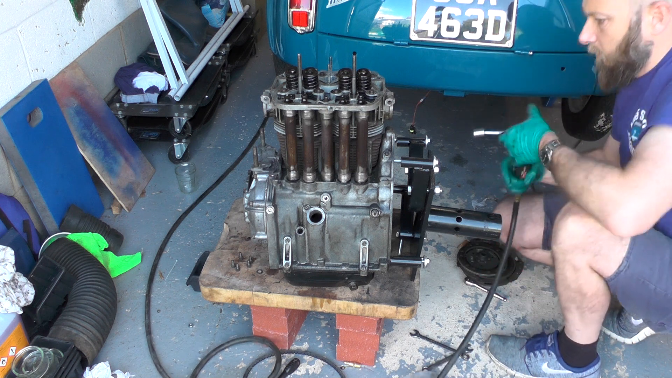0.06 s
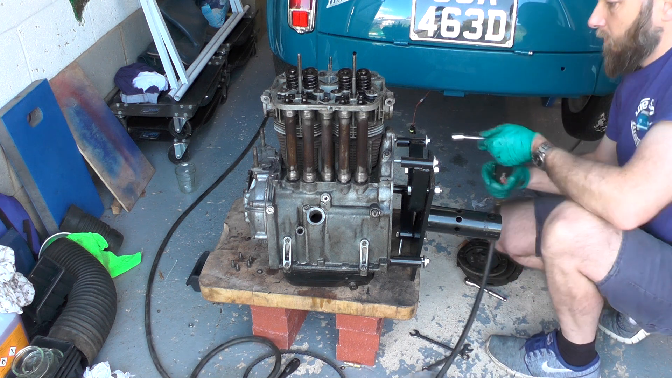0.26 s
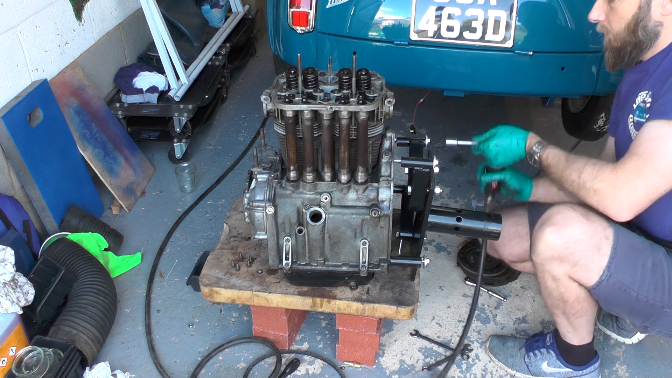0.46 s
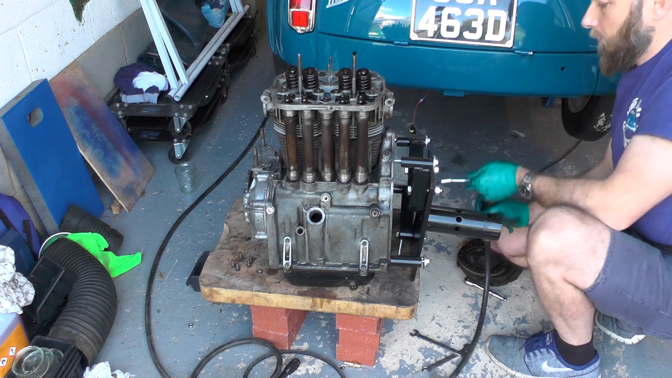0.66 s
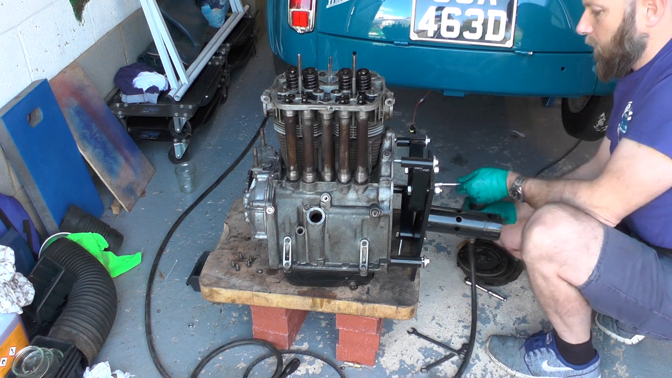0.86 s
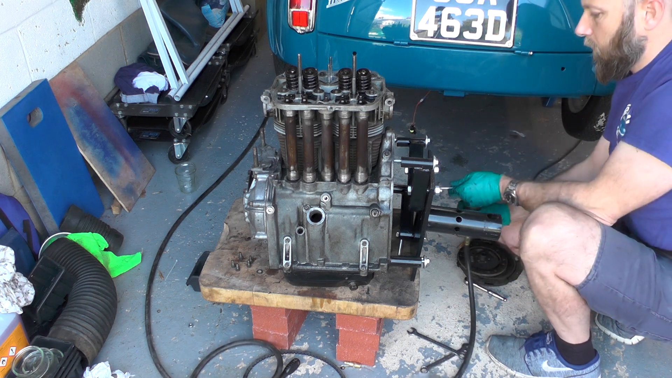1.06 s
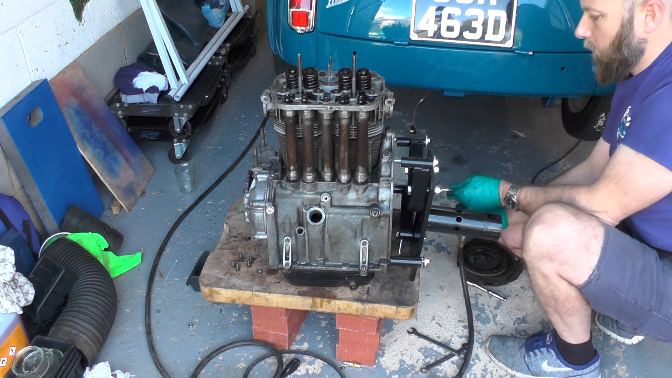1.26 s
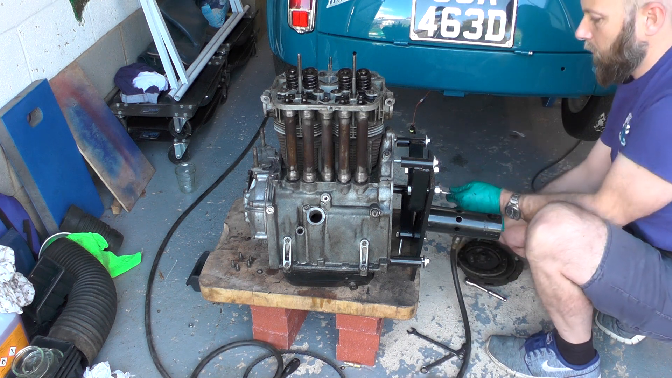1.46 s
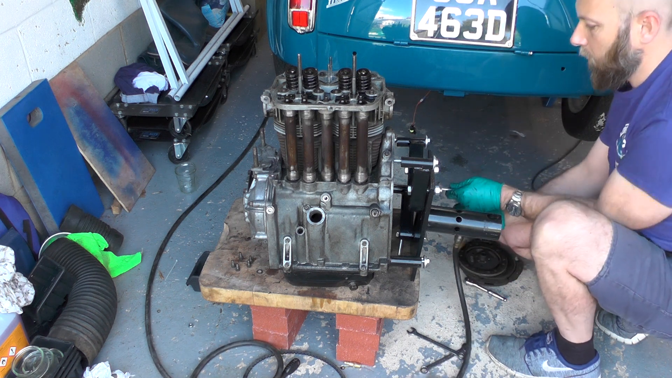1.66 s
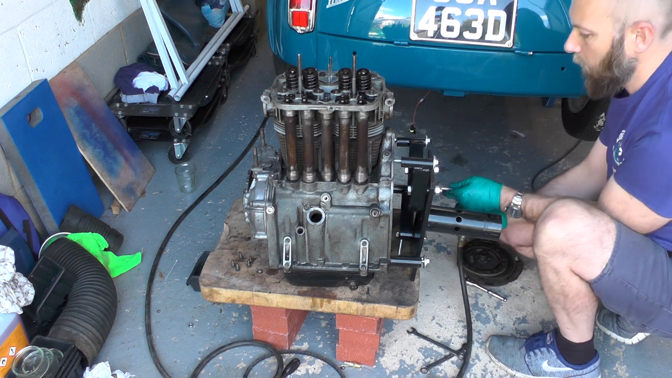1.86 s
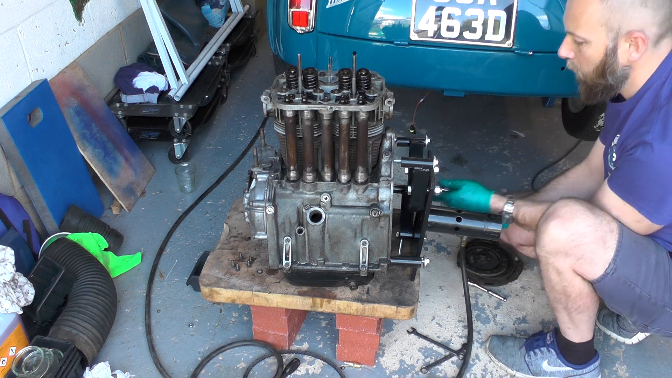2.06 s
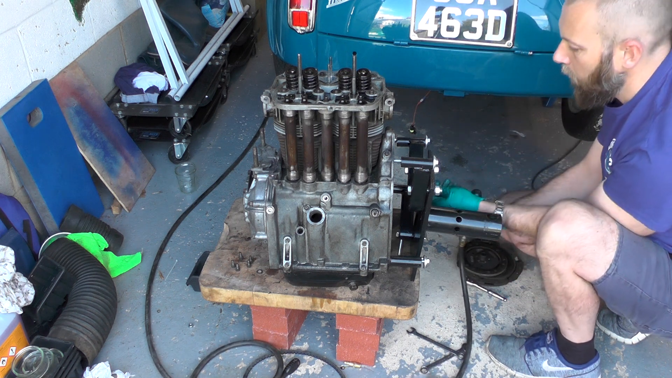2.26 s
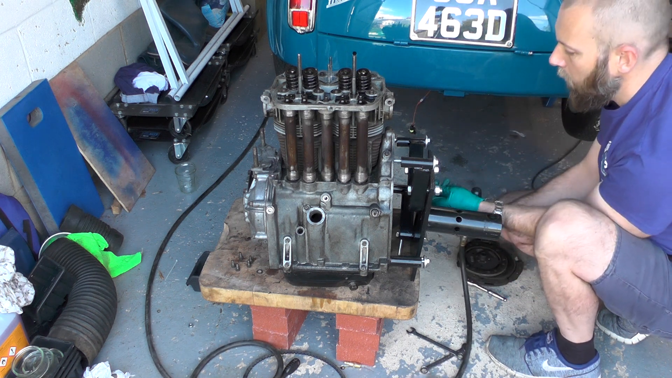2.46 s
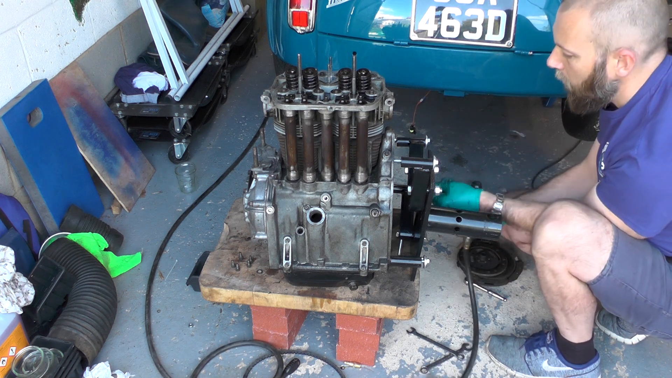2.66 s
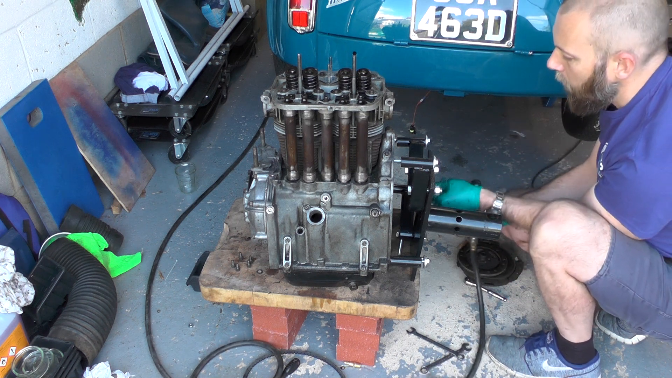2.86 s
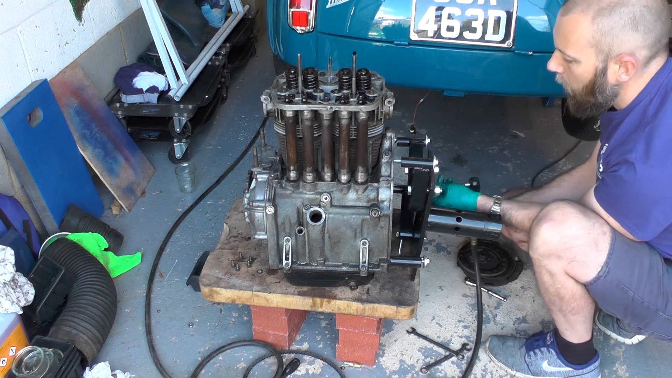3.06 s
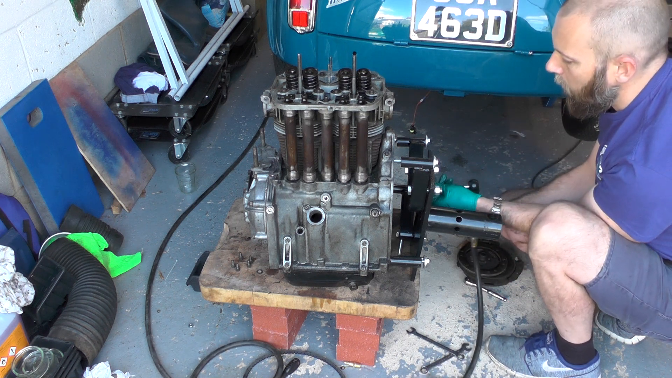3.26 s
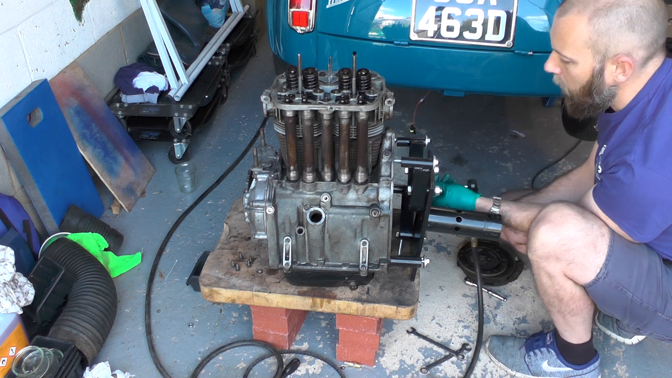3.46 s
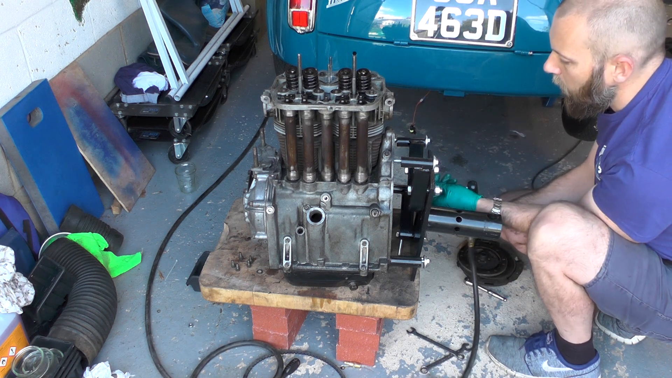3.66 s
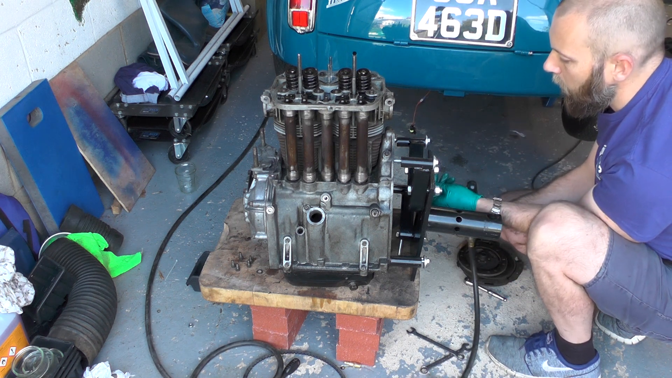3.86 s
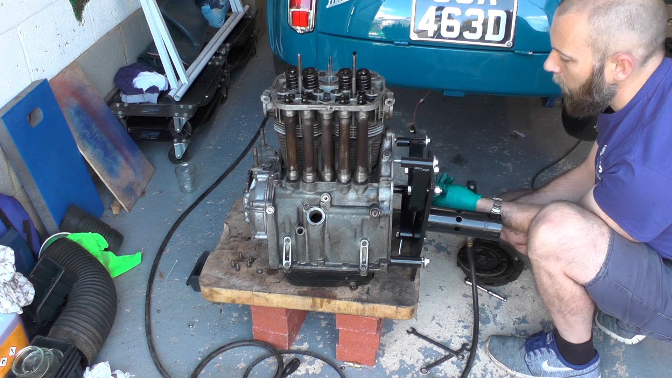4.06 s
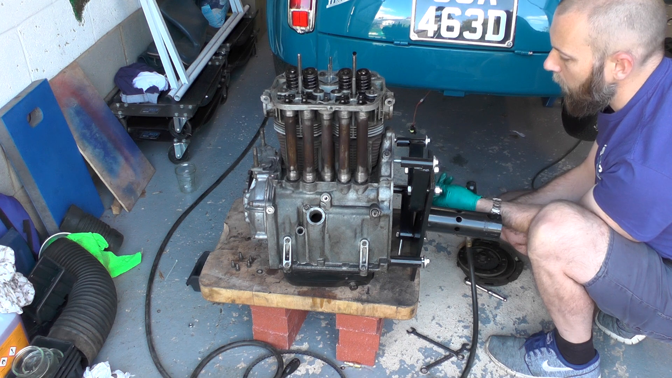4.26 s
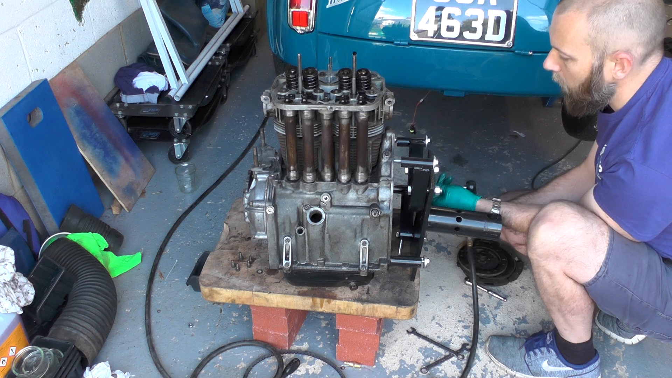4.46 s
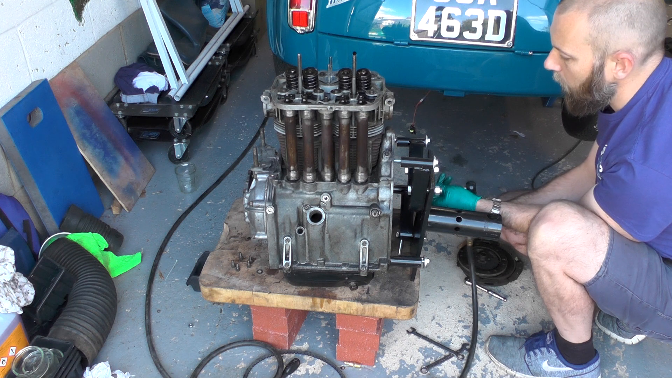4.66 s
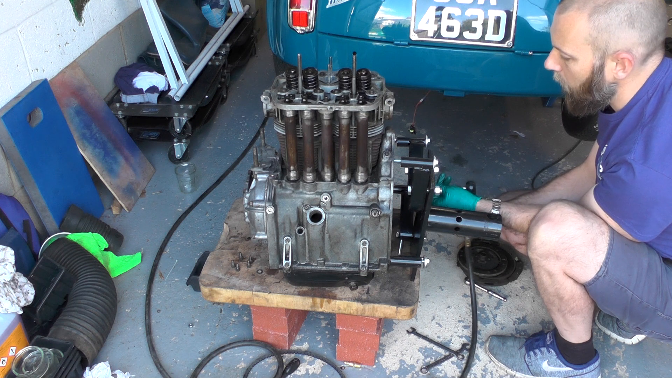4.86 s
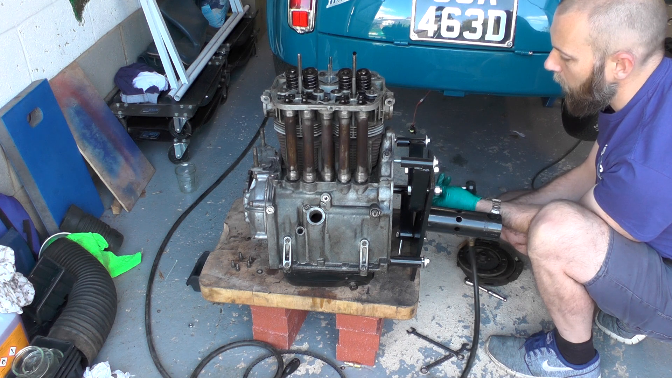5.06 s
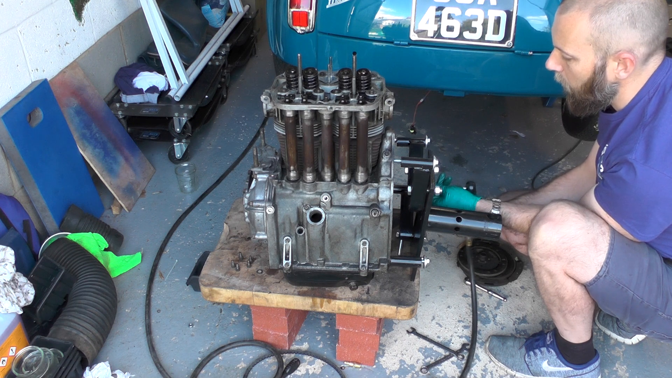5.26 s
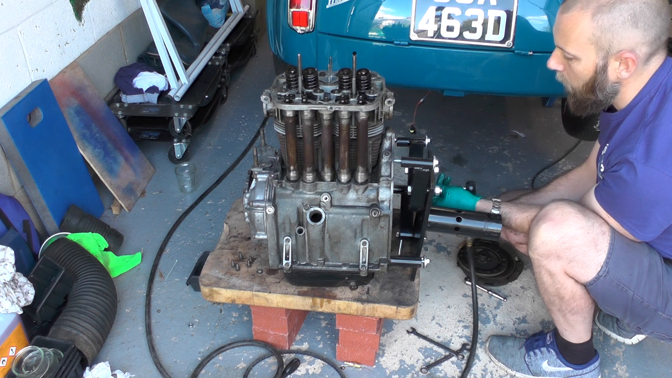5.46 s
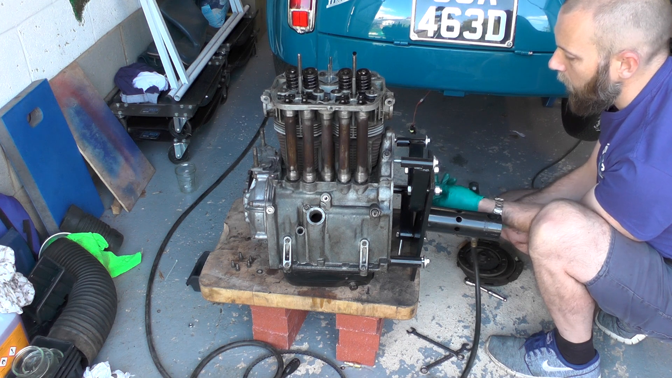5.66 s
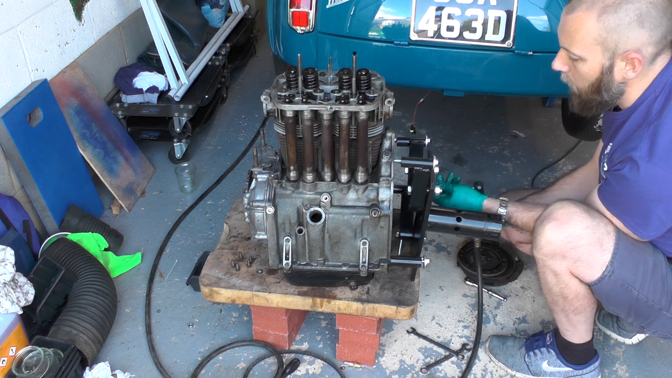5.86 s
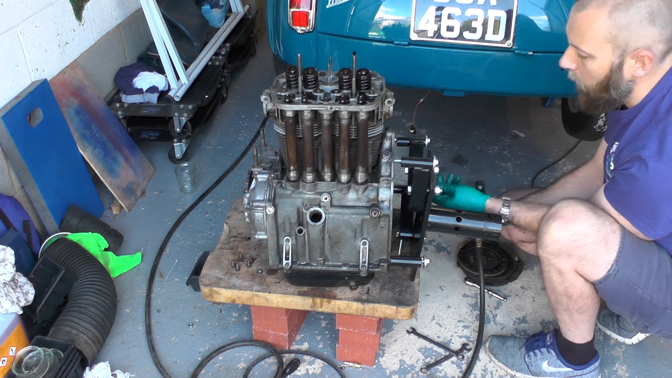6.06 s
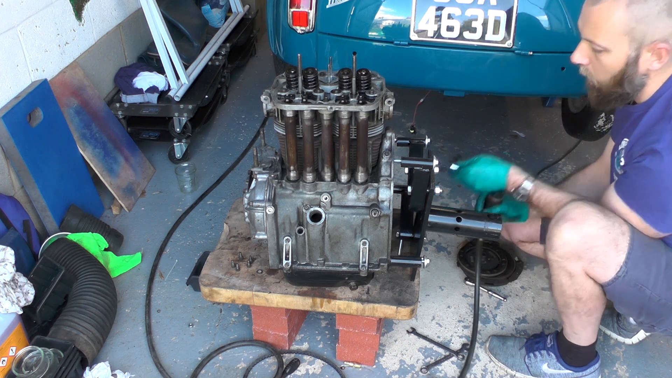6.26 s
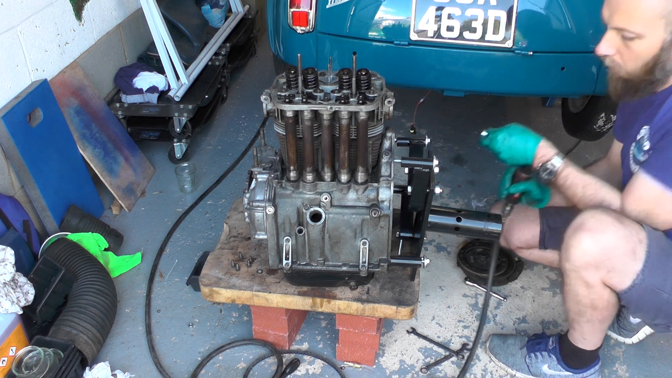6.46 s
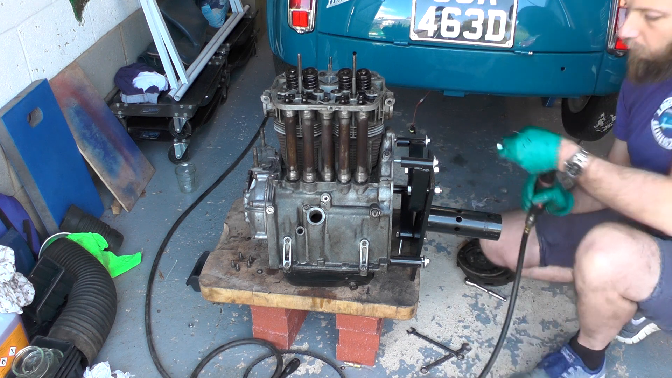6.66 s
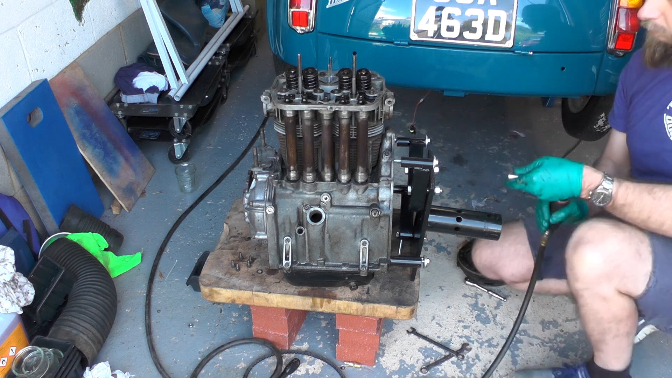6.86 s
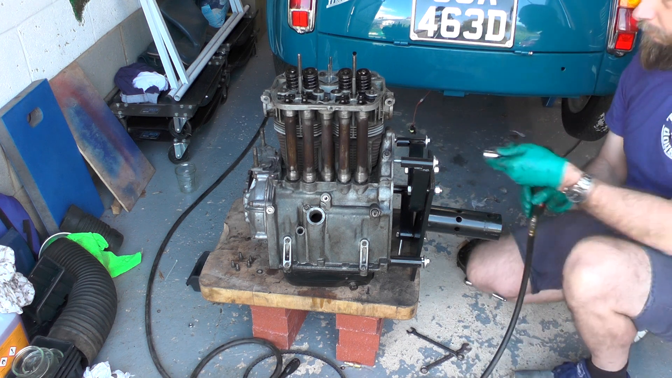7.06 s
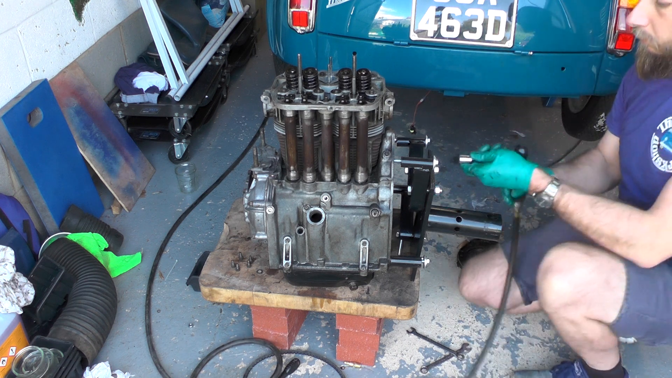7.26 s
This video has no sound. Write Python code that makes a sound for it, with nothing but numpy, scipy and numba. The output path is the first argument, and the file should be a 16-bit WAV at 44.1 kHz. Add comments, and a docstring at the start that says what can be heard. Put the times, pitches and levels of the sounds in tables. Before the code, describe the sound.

Steel knocks and ticks, then six short loud air ratchet bursts whining over hissing exhaust, and more hard clunks in a small garage.

```python
"""An air ratchet on a hose, close to the microphone, spins up six times as bolts are run into an engine stand:
its vanes chop the exhaust into a whine over a hiss of air, and its gears rattle.
Around it steel knocks and ticks, loose bolts chink, a thread squeaks, gloves scuff and dull bumps land, in a
small hard garage. Behind are mains hum, a distant road and draught on the microphone; the recorder's gain
control ducks everything when it gets loud."""
import sys
import numpy as np
from scipy import signal
from scipy.fft import rfft, irfft, next_fast_len
from scipy.io import wavfile
from scipy.ndimage import uniform_filter1d
from numba import njit

SR = 44100
rng = np.random.default_rng(int(sys.argv[2]) if len(sys.argv) > 2 else 0)


def wrap_up_sound(samples):
    """Save the sound to the file named by the first command line argument, as 16-bit audio."""
    columns = np.atleast_2d(samples).T
    # keep every value between -1 and 1, then stretch to whole-number steps
    tamed = np.clip(columns, -1, 1)
    steps = np.round(tamed * 32767).astype(np.int16)
    wavfile.write(sys.argv[1], SR, steps)


N = 321908
T = np.arange(N) / SR  # time, s

# Event levels are those before the room and the gain control; spectra give relative levels.
# distant road spectrum: pitch_hz, level_db (per Hz)
ROAD = [(35, -12), (70, 1.5), (120, -9), (155, -10.5), (200, -9.5), (400, -14.5), (600, -13), (900, -8.5),
        (1400, -16.5), (2400, -24.5), (4000, -27.5), (8300, -38.5), (10500, -44), (16000, -47.5)]
# cars passing on the road: nearest_s, half_length_s, rise_db
CARS = [(0, 0.44, 8.5), (1.95, 1, 7)]
# mains lines: pitch_hz, level_db
HUM = [(100, -48.5), (200, -59)]
# air buffeting the microphone, spectrum: pitch_hz, level_db (per Hz)
BUFFET = [(6, -7.5), (12, -1.5), (22, -9.5), (40, -24), (80, -45), (200, -45.5), (600, -72.5)]
# gusts on top of the steady draught: strongest_s, half_length_s, level_db
GUSTS = [(0, 0.56, -39.5), (1.317, 0.18, -37.5), (4.988, 0.13, -9), (7.09, 0.82, -21)]
# garage reverberation: pitch_hz, t60_s
GARAGE = [(200, 0.62), (700, 0.29), (1500, 0.41), (4000, 0.39), (8000, 0.37), (15000, 0.22)]
# engine parts ringing on in sympathy: pitch_hz, level_db (at resonance), t60_s
SYMPATHY = [(1456, -21, 2.5), (1467, -21, 2.2), (2371, -10, 1.4), (4460, -23, 1.0)]
# gloves, hose and shoes scuffing: middle_s, half_length_s, level_db
SCUFFS = [(0.015, 0.018, -39), (0.35, 0.082, -40), (0.566, 0.018, -29.5), (0.764, 0.053, -30.5),
          (1.112, 0.011, -36), (1.406, 0.056, -41.5), (2.177, 0.077, -52.5), (2.681, 0.041, -43),
          (2.87, 0.033, -44.5), (6.31, 0.16, -56.5), (6.573, 0.11, -41.5), (6.662, 0.054, -26),
          (6.862, 0.063, -26.5), (7.213, 0.073, -42.5)]
# scuffing spectrum, before its treble tilt: pitch_hz, level_db (per Hz)
SCUFF = [(90, -41), (200, -10.5), (450, -8.5), (1000, -3.5), (2000, -4), (3800, -4), (6000, -8.5),
         (8300, -6), (10500, -15.5), (16000, -19)]
# dull bumps of the hose and of a knee: start_s, peak_db, pitch_hz, t60_s
BUMPS = [(0.594, -28, 267, 0.12), (2.357, -27.5, 630, 0.078), (3.332, -22, 80, 0.045),
         (6.676, -23.5, 152, 0.16), (6.735, -20.5, 480, 0.12), (6.768, -20.5, 363, 0.066),
         (6.995, -33, 600, 0.037)]
# loose bolts chinking: start_s, peak_db
CHINKS = [(0.682, -36), (0.85, -40), (1.36, -57)]
# modes of a bolt, before each blow's scatter: pitch_hz, level_db, t60_s
BOLT = [(6200, -57, 0.27), (8050, 8, 0.36), (9400, 12, 0.16), (12730, 15, 0.25), (13900, -8, .2)]
# thin squeak of a thread turned by hand, before its wander: time_s, pitch_hz, level_db
SQUEAK = [(2.05, 13300, -66), (2.15, 15700, -73), (2.41, 14210, -67), (2.5, 12000, -66), (2.65, 11700, -73)]
# steel knocking on steel: start_s, peak_db, centre_hz, crack_t60_s
KNOCKS = [(0.012, -20.5, 4000, 0.02), (0.473, -13.5, 6040, .012), (0.474, -4.5, 2190, 0.031),
          (0.528, -12, 1830, 0.021), (0.558, -18.5, 3280, .045), (0.596, -14.5, 1310, 0.031),
          (0.654, -16.5, 2270, 0.03), (1.08, -14, 2920, 0.061), (1.1, -14, 2080, 0.033),
          (2.653, -30.5, 3020, 0.017), (2.692, -22.5, 2330, 0.021), (2.829, -29.5, 2170, 0.015),
          (6.56, -21.5, 4540, 0.023), (6.603, -17, 4300, 0.039), (6.674, -8, 990, 0.035),
          (6.728, -5, 1520, 0.025), (6.77, -10.5, 810, 0.031), (6.839, -10, 1220, 0.028),
          (7.241, -22.5, 4240, 0.029), (7.282, -23, 1220, 0.028)]
# spells of light ticks from fiddling with socket and bolt: start_s, end_s, typical_peak_db, centre_hz
FIDDLING = [(1.11, 1.16, -25, 3600), (1.22, 1.429, -32.5, 4300), (2.135, 2.224, -30, 2000),
            (2.704, 2.755, -36, 4550), (2.85, 2.896, -28, 2960), (6.68, 6.767, -34, 1500)]
# modes of the socket against the stand, before each blow's scatter: pitch_hz, level_db, t60_s
STEEL = [(742, 4, 0.087), (1050, 8, 0.037), (1125, -27.5, 0.039), (1570, 2, 0.033), (1743, 6.5, 0.055),
         (1883, 6.5, 0.026), (2460, -15.5, 0.079), (3250, -10.5, 0.05), (3000, -54, 0.059),
         (3670, -46, 0.049), (4790, -5.5, .08), (7500, -12, .07)]
# crack of a contact, spectrum: pitch_hz, level_db (per Hz)
CRACK = [(100, -15), (400, -15), (900, -1.5), (2000, -2), (3800, -4.5), (5500, -13), (8500, -2.5),
         (10500, -17.5), (16000, -20)]
# trigger pulls: pressed_s, released_s, free_vane_rate_hz, level_db, first_rush_db,
# seating_share (of speed lost as the bolt seats)
PULLS = [(3.33, 3.496, 1532, -6.5, 4.5, 0.00033), (3.679, 4.226, 1533, -2.5, 9.5, 0.031),
         (4.354, 4.53, 1530, -0.4, 7.5, 0.00024), (4.618, 4.77, 1526, 0, 11.5, 0.0002),
         (5.008, 5.153, 1543, -2.7, 13, 0.0012), (5.315, 5.435, 1535, -4.5, 13, 0.0023)]
# exhaust port response that the vane harmonics sweep through: pitch_hz, level_db
PORT = [(430, -21.5), (600, 4), (820, 11.5), (1100, 5.5), (1300, 3.5), (1430, 7.5), (1500, 2.5),
        (2000, -0.5), (2820, -8.5), (3000, -1.5), (3500, -4), (4250, -5), (4500, -1.5), (5750, -17),
        (7100, -6), (8500, -2.5), (10000, 5.5)]
# exhaust hiss spectrum: pitch_hz, level_db (per Hz)
HISS = [(130, -44), (270, -37.5), (420, -13.5), (800, -12.5), (1700, 7.5), (2400, -2.5), (3400, 5),
        (4700, 5.5), (5900, -4.5), (7200, 9), (8400, 4), (10000, -5), (15500, -5.5)]

ROAD_DB, DRAUGHT_DB = -48, -43.5  # road between cars; steady draught
TICK_GAP_S, TICK_RANGE_DB, TICK_T60_S = .03, 5.8, .028  # mean spacing, greatest deviation, crack decay
VALVE_S, START_S = .0097, .0045  # time constant of the opening valve; delay of the rotor behind the air
SAG_SHARE, SAG_S = .078, .225  # share of speed lost as hose pressure droops, and its time scale
SEAT_S = .02623  # time constant of the load growing as a bolt seats
FUNDAMENTAL_DB, OCTAVE_DB, OVERTONE_DB = -23, -12.5, -18  # vane harmonics, relative; the last is the third
FUNDAMENTAL_SAG_DB, OCTAVE_SAG_DB = 3, -2  # their change at full droop
OVERTONE_STEP_DB = -1.5  # change per harmonic above the third
OVERTONE_CUT, OVERTONE_RISE = 1.07, .75  # powers of air pressure, and of speed per harmonic number
LURCH = .12  # unevenness of a slow rotor, as a share of its speed


def undb(db):
    """Decibels to gain."""
    return 10 ** (np.asarray(db) / 20)


def unit(x):
    """Scale to rms 1."""
    return x / np.sqrt(np.mean(x ** 2))


def decay(t, t60):
    """Exponential decay by 60 dB in t60 seconds."""
    return np.exp(-np.log(1000) * t / t60)


def swell(middle_s, half_s):
    """A smooth rise and fall with a top of 1."""
    return np.exp(-((T - middle_s) / half_s) ** 2)


def curve(rows, axis=1):
    """One column of a time table, at every sample."""
    rows = np.asarray(rows)
    return np.interp(T, rows[:, 0], rows[:, axis])


def at(points, hz):
    """Read a spectrum on a log-frequency axis."""
    f, value = np.transpose(points)
    return np.interp(np.log(np.maximum(hz, 1)), np.log(f), value)


def noise(points, size=N, tilt_db=0):
    """Noise of rms 1 with a given spectrum, tilted above 500 Hz by dB per octave."""
    padded = next_fast_len(size)
    hz = np.maximum(np.fft.rfftfreq(padded, 1 / SR), 1)
    gain = undb(at(points, hz) + tilt_db * np.log2(np.maximum(hz, 500)))
    white = rfft(rng.standard_normal(padded))
    return unit(irfft(white * gain, padded)[:size])


def walk(rate):
    """Smooth random wander with an rms of 1, taking about `rate` new values a second."""
    k = max(int(SR / rate), 2)
    steps = np.repeat(rng.standard_normal(N // k + 1), k)
    return unit(uniform_filter1d(steps, k)[:N])


def add(out, start_s, x):
    """Mix a sound in at its time."""
    i = max(int(start_s * SR), 0)
    out[i:i + len(x)] += x[:max(N - i, 0)]


def add_peak(out, start_s, x, peak_db):
    """Mix a sound in at its time and peak level."""
    add(out, start_s, x * undb(peak_db) / np.abs(x).max())


def ring(modes, t):
    """Decaying modes; every blow lands elsewhere and weights them anew."""
    hz, db, t60 = np.transpose(modes)[:, :, None]
    weight, detune, turn = rng.standard_normal((3, len(modes), 1))
    waves = np.sin(2 * np.pi * (hz * (1 + 0.0088 * detune) * t + turn))
    return np.sum(undb(db + 2 * weight) * decay(t, t60) * waves, axis=0)


def distant_road():
    """Far tyre noise, swelling as cars pass."""
    passing_db = sum(db * swell(s, half_s) for s, half_s, db in CARS)
    return noise(ROAD) * undb(ROAD_DB + passing_db + 1.1 * walk(10))


def mains_hum():
    """Steady mains lines whose level wavers together."""
    lines = sum(np.sqrt(2) * undb(db) * np.sin(2 * np.pi * hz * T) for hz, db in HUM)
    return undb(2 * walk(8)) * lines


def draught():
    """Air moving over the microphone: low buffeting that swells with the gusts."""
    strength = undb(DRAUGHT_DB) + sum(undb(db) * swell(s, half_s) for s, half_s, db in GUSTS)
    return noise(BUFFET) * strength


def garage(x, wet_db=-10, early_db=-13, early_s=0.012):
    """Close reflections, then the tail of a small hard room that decays differently in each band."""
    t = T[:SR]
    white, hz = rfft(rng.standard_normal(SR)), np.fft.rfftfreq(SR, 1 / SR)
    tail = 0
    for row, (_, t60) in zip(np.eye(len(GARAGE)), GARAGE):
        # each band's share fades out towards its neighbours
        share = at([(f, w) for (f, _), w in zip(GARAGE, row)], hz)
        tail = tail + irfft(white * share, SR) * decay(t, t60)
    early = rng.standard_normal(SR) * np.exp(-t / early_s)
    late = undb(wet_db) * unit(tail * (t > .008))
    close = undb(early_db) * unit(early * (t > .002))
    return x + signal.fftconvolve(x, (late + close) / np.sqrt(SR))[:N]


def sympathy(x):
    """Lightly damped steel picks up the sound and rings on."""
    out = np.zeros(N)
    for hz, db, t60 in SYMPATHY:
        pole = np.exp((2j * np.pi * hz - np.log(1000) / t60) / SR)
        out += undb(db) * 2 * (1 - abs(pole)) * signal.lfilter([1], [1, -pole], x).imag
    return out


def scuffs(grain_db=3, catch_db=2):
    """Swells of friction, grainy where the surfaces catch and slip."""
    power = sum((undb(db) * swell(s, half_s)) ** 2 for s, half_s, db in SCUFFS)
    grain = unit(undb(grain_db * walk(1500) + catch_db * walk(110)))
    return noise(SCUFF, tilt_db=-1.44) * np.sqrt(power) * grain


def bumps():
    """Soft, heavy contacts: a low band of noise that dies quickly."""
    out, t = np.zeros(N), T[:2 ** 13]
    for s, db, hz, t60 in BUMPS:
        band = [(hz / 3, -30), (hz, 0), (hz * 3, -30), (hz * 10, -65)]
        onset = 1 - np.exp(-t / 0.00029)
        add_peak(out, s, noise(band, size=len(t)) * decay(t, t60) * onset, db)
    return out


def bolt_chinks():
    """Loose bolts chink in the hand: a few high modes ring down."""
    out = np.zeros(N)
    for s, db in CHINKS:
        add_peak(out, s, ring(BOLT, T[:SR // 3]), db)
    return out


def thread_squeak():
    """A dry thread squeaks: one thin tone, unsteady in pitch and level."""
    hz = curve(SQUEAK) * (1 + 0.0043 * walk(200))
    turning = (T > SQUEAK[0][0]) & (T < SQUEAK[-1][0])
    level = undb(curve(SQUEAK, axis=2) + 7.9 * walk(40))
    return turning * level * np.sin(2 * np.pi * np.cumsum(hz) / SR)


def ticks():
    """Light contacts at uneven intervals during each spell of fiddling, as rows like those of the knocks."""
    rows = []
    for start, end, db, centre_hz in FIDDLING:
        count = max(round((end - start) / TICK_GAP_S), 1)
        for k, (place, strength, colour) in enumerate(rng.uniform(-1, 1, (count, 3))):
            s = start + (end - start) * (k + .5 + .5 * place) / count
            rows.append((s, db + TICK_RANGE_DB * strength, centre_hz * 2 ** (.5 * colour), TICK_T60_S))
    return rows


def knocks(ring_db=-20, focus_db=4.5, contact_s=0.00062):
    """Each contact is a short crack and a ring of steel; soft contacts are dull, sharp ones bright."""
    out, t = np.zeros(N), T[:2 ** 14]
    hz = np.maximum(np.fft.rfftfreq(len(t), 1 / SR), 100)
    onset = 1 - np.exp(-(t / contact_s) ** 4)
    for s, db, centre_hz, t60 in KNOCKS + ticks():
        crack = noise(CRACK, size=len(t)) * decay(t, t60)
        hit = (crack + undb(ring_db) * ring(STEEL, t)) * onset
        # energy falls away on both sides of the centre
        focus = undb(-focus_db * np.log2(hz / centre_hz) ** 2)
        add_peak(out, s, irfft(rfft(hit) * focus)[:len(t) // 2], db)
    return out


def trigger_pulls(spin_up_s=.0275, coast_s=.036, run_on_s=0.0018, shut_s=0.029, rush_s=0.012,
                  fade_s=0.048, stall_s=0.032):
    """Air and rotor through each pull: the motor races up as the valve opens and coasts down when it shuts."""
    speed, air, drive, rush, droop, full_hz, pull_db = np.zeros((7, N))
    for on, off, free_hz, db, rush_db, seating in PULLS:
        span = slice(int(on * SR), int((off + .3) * SR))
        since, after = np.maximum(T[span] - on, 0), np.maximum(T[span] - off, 0)
        opened = 1 - np.exp(-(since / VALVE_S) ** 2)
        spin_up = np.tanh(np.maximum(since - START_S, 0) / spin_up_s)
        speed[span] += spin_up * np.exp(-np.maximum(after - run_on_s, 0) / coast_s)
        air[span] += opened * np.exp(-after / shut_s)
        drive[span] += opened * np.exp(-after / fade_s - (after / stall_s) ** 4)
        # the longer the pull, the lower the pressure in the hose and the slower the motor
        droop[span] = np.tanh(since / SAG_S)
        load = seating * np.exp(np.minimum(T[span] - off, 0) / SEAT_S)
        full_hz[span] = free_hz * (1 - SAG_SHARE * droop[span] - load)
        pull_db[span] = db
        # the pressure stored in the hose escapes first
        rush[span] += opened * undb(rush_db) * np.exp(-since / rush_s)
    return speed, air, drive, rush, droop, full_hz, pull_db


def vane_whine(hz, phase, speed, air, drive, rush, droop, pull_db, chatter_db=6, kick=0.37, shaft_db=-51):
    """Vanes passing the exhaust port make five harmonics, coloured by the port, over weak shaft lines."""
    on = drive > 1e-4
    harmonic_db = [FUNDAMENTAL_DB + FUNDAMENTAL_SAG_DB * droop[on], OCTAVE_DB + OCTAVE_SAG_DB * droop[on]]
    harmonic_db += [OVERTONE_DB + OVERTONE_STEP_DB * k for k in range(3)]
    whine = np.zeros(N)
    for k in range(1, 6):
        # overtones need both speed and air pressure behind the vanes
        force = drive + kick * rush if k == 1 else air ** OVERTONE_CUT * speed ** (OVERTONE_RISE * k)
        # below full speed the vanes are not pressed firmly outwards and chatter
        chatter = chatter_db * np.sqrt(np.clip(1 - speed[on], 0, 1)) * walk(500)[on]
        db = pull_db[on] + harmonic_db[k - 1] + at(PORT, k * hz[on]) + chatter
        whine[on] += force[on] * undb(db) * np.sin(k * phase[on] + rng.uniform(0, 2 * np.pi))
    # four slightly unequal vanes leave weak lines at multiples of the shaft rate
    shaft = phase[on] / 4
    for k in range(2, 26):
        gain = undb(shaft_db + 2.53 * rng.standard_normal())
        whine[on] += air[on] * gain * np.sin(k * shaft + rng.uniform(0, 2 * np.pi))
    return whine


def exhaust_hiss(phase, air, rush, pull_db, chop=0.18):
    """Turbulent exhaust air, chopped at the vane rate."""
    flow = air * undb(pull_db) + rush
    return noise(HISS) * flow * (1 + chop * np.cos(phase)) * undb(0.5 * walk(110))


def gear_clatter(air, drive, rush):
    """Gears rattle while they take up the drive and again as they run down."""
    rattle = rush + 2.0 * np.maximum(drive - air, 0)
    return noise(CRACK, tilt_db=-6) * rattle * undb(4.1 * walk(600))


def ratchet(whine_db=21, hiss_db=-4.5, clatter_db=-7, flutter=.002, jitter=0.004):
    """A vane motor driven by air: whine, hiss and clatter all follow the same rotor and trigger."""
    speed, air, drive, rush, droop, full_hz, pull_db = trigger_pulls()
    # a slow rotor turns unevenly
    lurch = LURCH * np.clip(1 - speed, 0, 1) * walk(600)
    hz = full_hz * speed * (1 + flutter * walk(70) + jitter * walk(1500) + lurch)
    phase = 2 * np.pi * np.cumsum(hz) / SR
    whine = undb(whine_db) * vane_whine(hz, phase, speed, air, drive, rush, droop, pull_db)
    hiss = undb(hiss_db) * exhaust_hiss(phase, air, rush, pull_db)
    return whine + hiss + undb(clatter_db) * gear_clatter(air, drive, rush)


def scene():
    """Tool and handwork in the garage, over the background."""
    background = distant_road() + mains_hum() + draught()
    handwork = scuffs() + bumps() + bolt_chinks() + thread_squeak() + knocks()
    work = handwork + ratchet()
    return (garage(work) + sympathy(work) + background)[None]


@njit
def follow(power, attack, release):
    """An envelope that rises fast and sinks slowly."""
    out, e = np.empty(len(power)), 0.
    for i in range(len(power)):
        e += (power[i] - e) * (attack if power[i] > e else release)
        out[i] = e
    return out


def record(dry, ceiling_db=-13.0, attack_s=0.013, release_s=0.16, top_hz=15900):
    """Gain control pulls loud sounds down and recovers slowly; peaks are rounded and the top is cut."""
    power = uniform_filter1d(dry[0] ** 2, size=256)
    envelope = follow(power, 1 / (attack_s * SR), 1 / (release_s * SR))
    gain = 1 / np.sqrt(np.maximum(envelope / undb(ceiling_db) ** 2, 1))
    rounded = 1.15 * np.tanh(dry * gain / 1.15)
    top_cut = signal.ellip(10, .2, 70, top_hz, fs=SR, output="sos")
    return signal.sosfilt(top_cut, rounded)


dry = scene()
out = record(dry)
wrap_up_sound(out)
```